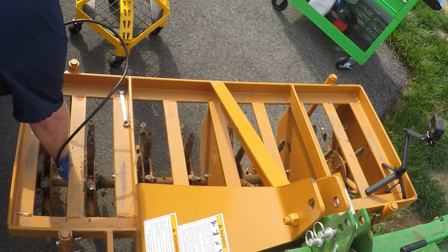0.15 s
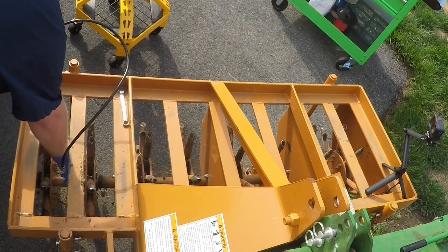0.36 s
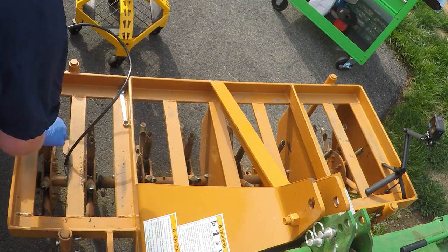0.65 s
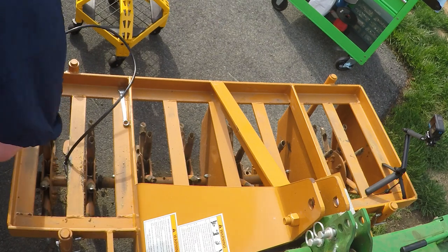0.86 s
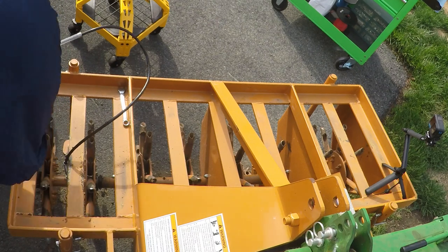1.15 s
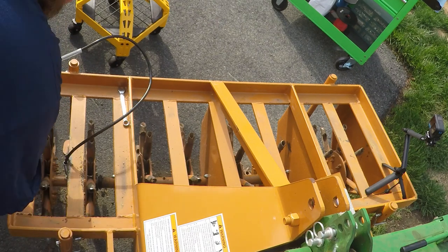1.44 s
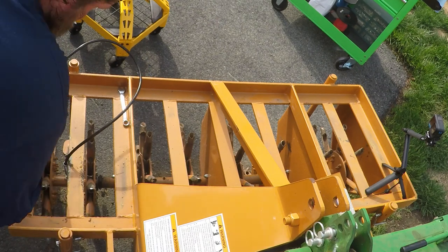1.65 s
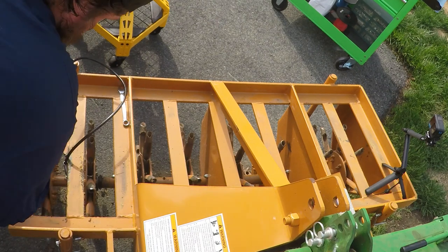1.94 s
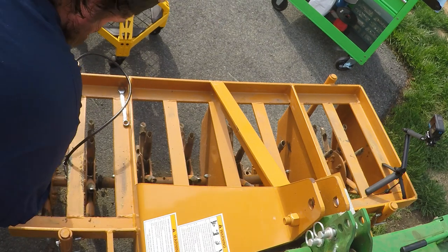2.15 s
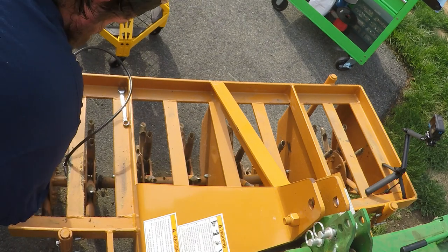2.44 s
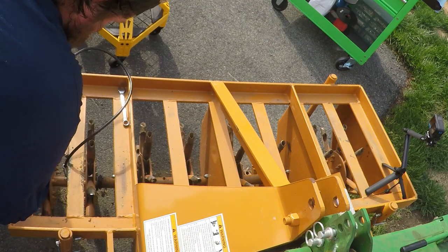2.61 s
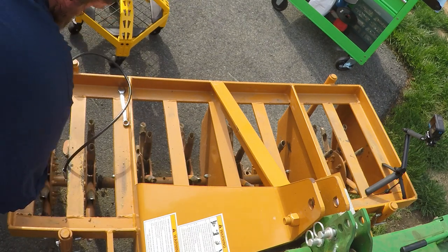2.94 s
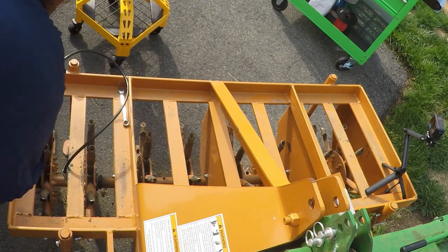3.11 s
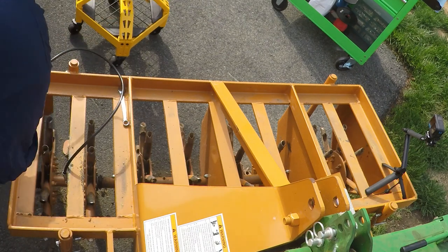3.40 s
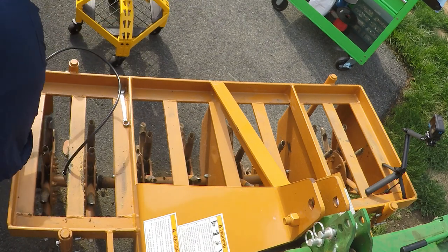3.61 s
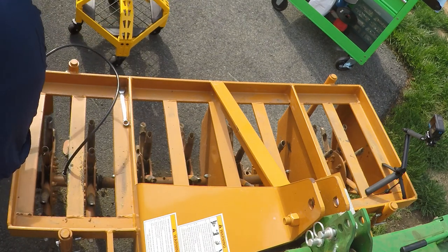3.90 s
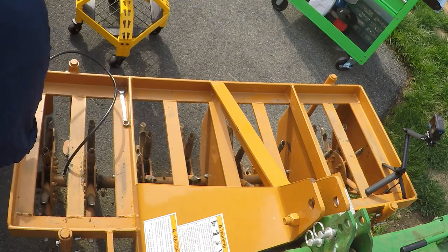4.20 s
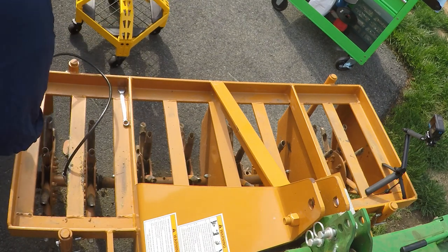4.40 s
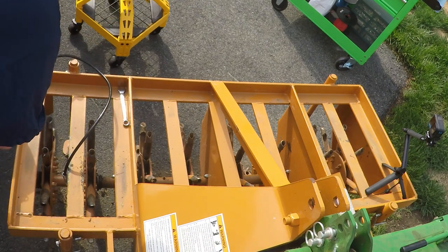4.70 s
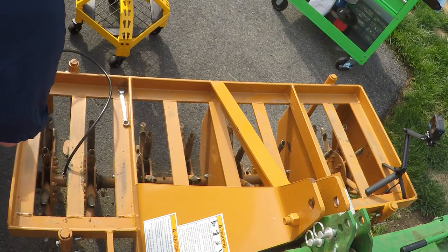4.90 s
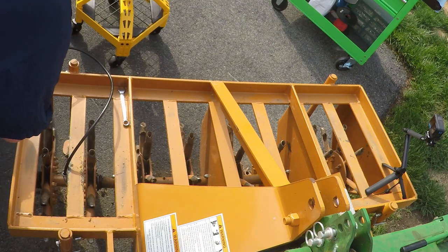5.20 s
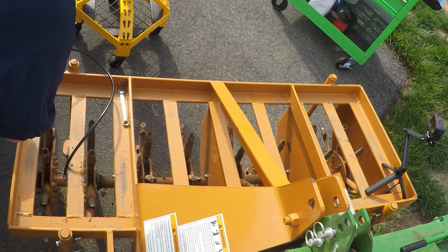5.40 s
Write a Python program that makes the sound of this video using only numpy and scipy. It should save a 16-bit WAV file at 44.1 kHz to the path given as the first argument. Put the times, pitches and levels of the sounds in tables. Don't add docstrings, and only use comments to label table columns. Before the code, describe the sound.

Constant low engine drone outdoors, one idle smooth and wandering, the other rougher. Quiet handling of hose and trigger comes first, with a few clicks. A battery grease gun then bursts in close by, much louder: buzzing motor, gear whine, grinding teeth and rattling housing, sagging and recovering with each plunger stroke. After a short gap of engine hum a second burst follows, still running at the end. Dry, close, almost centred sound with little extreme treble.

```python
import sys
import numpy as np
from scipy import signal
from scipy.fft import rfft, irfft, next_fast_len
from scipy.io import wavfile

SR = 44100
rng = np.random.default_rng(int(sys.argv[2]) if len(sys.argv) > 2 else 0)


def elevation(decibels):
    levels = np.asarray(decibels, float)
    return 10 ** (levels / 20)


def to_wav(s):
    ch = np.atleast_2d(s).T
    pcm = np.round(np.clip(ch, -1, 1) * 32767)
    wavfile.write(sys.argv[1], SR, pcm.astype(np.int16))


N = 244755

# (firing f/Hz if steady, line width f/Hz, [(firing order, level/dB rms)]); the smooth one's f is in its idle
SMOOTH_ENGINE = (0.53, [(1, -52.5), (4, -44.5), (5, -58), (6, -60)])
ROUGH_ENGINE = (86.3, 1.72, [(1, -51.5), (1.2, -61), (2, -46.5), (2.61, -49.5), (3, -49), (4, -61.5)])
# (t/s, firing f/Hz, second order level/dB)
SMOOTH_IDLE = [(0.0, 70.0, -43), (0.45, 70.2, -52), (0.8, 70.43, -42.5), (1.2, 70.73, -48),
               (1.5, 69.3, -39), (1.85, 69.23, -44.5), (2.2, 69, -39), (2.75, 69.3, -47.5),
               (3.2, 69.4, -40), (3.9, 70, -47), (4.1, 70.47, -60), (4.7, 70.41, -43.5), (5.55, 70.7, -49)]
# (f/Hz, level/dB per Hz)
ENGINE_ROAR = [(15, -49), (25, -42), (65, -12.5), (163, -4), (217, 2), (283, -3), (341, -9.5), (493, -14.5),
               (659, -14.5), (3560, -30), (5880, -42.5), (7260, -48.5), (9210, -73), (11100, -69),
               (13700, -93)]
# (loudest t/s, level/dB, rise t/s, fall t/s)
RUBS = [(0.0, -67, .02, 0.11), (0.5, -65.5, 0.051, 0.11), (0.588, -58, .025, .03), (0.885, -66, .012, 0.15),
        (1.058, -67, .08, .05), (1.26, -68.5, 0.23, .2), (1.42, -63.5, .04, .04), (1.55, -72, .15, .1),
        (1.672, -57.5, 0.081, 0.029), (1.862, -65, .012, .04), (4.1, -66, .03, 0.12),
        (4.564, -66, .015, .015), (4.6, -64, .04, .01)]
# (f/Hz, level/dB per Hz)
RUSTLE_COLOUR = [(1500, 1), (3000, 7.5), (6000, 1.5), (8000, -10.5), (11000, -9), (13800, -28)]
# (t/s, peak level/dB)
TICKS = [(0.1945, -56), (0.2994, -58), (0.5344, -36), (0.5844, -55.5), (0.8804, -38.5), (1.4156, -51),
         (1.4894, -44), (1.609, -41.5), (1.6694, -63), (1.8597, -61), (4.4294, -66)]
# (on t/s, off t/s, starting load 0-1)
TRIGGER = [
    (1.910, 4.02, 1),
    (4.607, 5.6, .95),
]
# (pressure build t/s, extra brush sparking level/dB, its fading t/s, rattle at first level/dB)
STARTS = [
    (0.29, 11, 0.058, -5.5),
    (0.082, 5.0, 0.68, -11),
]
# (t/s, pull on shaft f/Hz, grind level/dB, whine level/dB, pressure boom level/dB)
STROKES = [(2.082, 134.3, 0.5, -33.5, -25), (2.296, 117.7, -3.5, -31.5, -24.5),
           (2.499, 123.8, 3.5, -34, -27), (2.709, 136.7, 5.5, -31, -27.5), (2.92, 136.8, 0.5, -32, -26),
           (3.132, 138.3, -2, -32, -27.5), (3.343, 136.3, -1, -31.5, -28.5), (3.554, 138.7, 0, -29.5, -26),
           (3.765, 142.8, 1, -29, -29.5), (3.975, 135.2, -4, -28, -28.5), (4.796, 130.1, 3, -34.5, -26),
           (5.005, 133.4, 2, -31, -24.5), (5.215, 136.6, 4.5, -34.5, -26),
           (5.427, 132.2, 3.5, -31.5, -26.5)]
# (multiple of shaft f, level/dB rms at free speed, loss/dB when slowed, roughness 0-1)
SHAFT_ORDERS = [(1, -42.5, 9, 0), (2, -46, -4.5, 0.04), (3, -41, 2, 0), (4, -34, 8.5, 0.08),
                (5, -42, 6, 0.12), (6, -46, 1, 0.7), (7, -45, 10, 0), (8, -47.5, -2, 0.5),
                (9, -60, -5, 0.3), (10, -49.5, -13, 0.6), (11, -46.5, -19, 0.5), (15, -40, 1.5, 0.4),
                (20, -56, -6, 0.7)]
GEAR_LINES = [(1.29, -55.5, 2, 0.05), (2.29, -58.5, 7.5, 0.2), (2.7, -43, 0.5, 0.22), (3.3, -45, 6.5, 0.22),
              (3.701, -41.5, 7, .12), (4.29, -55.5, 5, 0), (4.59, -45, 5, 0)]
# (f/Hz, width f/Hz, level/dB)
HOUSING = [(417.4, 6.2, 6), (856, 17, -0.5), (942, 26.5, 3.5), (1146, 13, -1.5), (1362, 17, 0),
           (1545, 6.6, -2), (2133, 56, -10.5), (2518, 17, -3.5), (2790, 26, -11), (3070, 82, -4),
           (3805, 58, -1.5)]
# (f/Hz, level/dB per Hz)
GRIND = [(300, -18), (410, 3), (520, -8), (1000, 22), (2500, 10), (4000, -19.5), (6000, 16), (7500, -5.5),
         (11000, -21), (14000, -33)]
# (f/Hz, level/dB per Hz)
RATTLE = [(210, -38), (350, -19.5), (480, -18.5), (700, -17), (900, -11), (1150, -9), (1400, -11),
          (1670, -16), (2500, -6.5), (4100, -8.5), (4500, -12), (6160, -17.5), (8900, -40), (10900, -33),
          (13700, -53.5)]
# (t/s, peak level/dB)
KNOCKS = [
    (1.9115, -15),
    (4.613, -30),
]
# (f/Hz, side minus mid level/dB)
SIDE_COLOUR = [(20, -7), (60, -24), (150, -55.5), (300, -33), (600, -35.5), (1400, -41.5), (3000, -37),
               (6000, -31.5), (9000, -21), (14000, -1.5)]

FREE_HZ = 365.5


def rms_one(x):
    return x / np.sqrt(np.mean(x ** 2) + 1e-20)


def in_time(rows):
    s, *columns = np.transpose(rows)
    return [np.interp(np.arange(N) / SR, s, c) for c in columns]


def colour(x, points):
    size = next_fast_len(N + 8192)
    hz = np.arange(size // 2 + 1) * SR / size + 1
    at, level_db = np.transpose(points)
    gain = elevation(np.interp(np.log(hz), np.log(at), level_db, left=-70, right=-70))
    return irfft(rfft(x, size) * gain, size)[:N]


def drift(rate_hz):
    r = np.exp(-32 * np.pi * rate_hz / SR)
    chance = rng.standard_normal(N // 16 + 3002)
    slow = signal.lfilter([1], [1, -2 * r, r * r], chance)[3000:]
    return np.interp(np.arange(N) / 16, np.arange(len(slow)), rms_one(slow - slow.mean()))


def filtered(x, order, edge_hz, kind="low"):
    return signal.sosfilt(signal.butter(order, edge_hz, kind, fs=SR, output="sos"), x)


def resonance(x, hz, width_hz):
    r = np.exp(-np.pi * width_hz / SR)
    poles = [1, -2 * r * np.cos(2 * np.pi * hz / SR), r * r]
    return signal.lfilter([(1 - r * r) / 2, 0, (r * r - 1) / 2], poles, x)


def tone(phase, rough, spread_hz):
    rough = np.clip(rough, 0, 1)
    smear = (drift(spread_hz) + 1j * drift(spread_hz)) / np.sqrt(2)
    start = np.exp(2j * np.pi * rng.random())
    wobble = np.sqrt(1 - rough) * start + np.sqrt(rough) * smear
    return np.sqrt(2) * np.real(wobble * np.exp(1j * phase))


def firing_phase(firing_hz, wander):
    return 2 * np.pi * np.cumsum(firing_hz * (1 + wander * drift(1.71))) / SR


def engine(phase, wander_hz, orders, rough):
    return sum(elevation(level_db) * tone(k * phase, rough, wander_hz * np.sqrt(k)) for k, level_db in orders)


def smooth_engine():
    firing_hz, second_db = in_time(SMOOTH_IDLE)
    third_db = -41.5 - 3 * np.abs(firing_hz - 70.2) + 0.91 * drift(8.6)
    wander_hz, orders = SMOOTH_ENGINE
    phase = firing_phase(firing_hz, wander=.0008)
    steady = engine(phase, wander_hz, orders, rough=0.24)
    return steady + engine(phase, wander_hz, [(2, second_db), (3, third_db)], rough=.05)


def rough_engine():
    firing_hz, wander_hz, orders = ROUGH_ENGINE
    return engine(firing_phase(firing_hz, wander=.0031), wander_hz, orders, rough=.4)


def engine_roar():
    roar = rms_one(colour(rng.standard_normal(N), ENGINE_ROAR))
    return elevation(-42.5 + 0.35 * drift(41)) * roar


def rubbing():
    t = np.arange(N) / SR
    edge_db, rest_db = 12, -81
    movements = []
    for s, level_db, rise_s, fall_s in RUBS:
        away = np.where(t < s, (s - t) / rise_s, (t - s) / fall_s)
        movements.append(level_db - edge_db * away)
    return elevation(np.maximum(np.max(movements, axis=0), rest_db))


def hand_rustle():
    grains = rng.standard_normal(N) * elevation(2.6 * drift(150))
    return elevation(4.0) * rubbing() * rms_one(colour(grains, RUSTLE_COLOUR))


def hand_ticks():
    ticks = np.zeros(N)
    for s, peak_db in TICKS:
        i = round(s * SR)
        ticks[i:i + 500] = elevation(peak_db - 12) * np.exp(-np.arange(500) / 110) * rng.standard_normal(500)
    return filtered(ticks, 2, [2500, 9000], "band")


def motor_motion():
    inrush_hz, inrush_s, brake_hz = 338, .0307, 500
    stroke_s, inertia_s = .0671, .082
    t = np.arange(N) / SR
    drive, load, grind = np.zeros(N), np.zeros(N), np.zeros(N)
    for on, off, starting in TRIGGER:
        since = np.clip(t - on, 0, None)
        powered = (t > on) & (t < off)
        drive += powered * (FREE_HZ + inrush_hz * np.exp(-since / inrush_s))
        drive -= brake_hz * ((t >= off) & (t < off + .05))
        load += starting * powered * np.exp(-(since / .12) ** 2)
    for s, pull_hz, grind_db, *_ in STROKES:
        push = np.clip((t - s) / stroke_s, 0, 1)
        drive -= pull_hz * np.sin(np.pi * push)
        bite = np.sin(np.pi * push ** 1.12)
        load += bite
        grind += elevation(grind_db) * bite ** 2
    r = np.exp(-1 / (inertia_s * SR))
    return np.clip(signal.lfilter([1 - r], [1, -r], drive), 0, None), load, grind


def swell(lift_db, delay_s, length_s):
    t = np.arange(N) / SR
    return lift_db * sum(np.sin(np.pi * np.clip((t - row[0] - delay_s) / length_s, 0, 1)) ** 2
                         for row in STROKES)


def gun_levels():
    t = np.arange(N) / SR
    silent_db = -110.
    levels = np.full((3, N), silent_db)
    pressure_db = in_time(STROKES)[3]
    for (on, off, _), (build_s, spark_db, spark_s, first_db) in zip(TRIGGER, STARTS):
        since = np.clip(t - on, 0, None)
        slack_db = -7 * np.exp(-(since / build_s) ** 4)
        boom = pressure_db + swell(4.5, delay_s=-0.017, length_s=0.15) + slack_db
        rattle = -28 + swell(3.85, delay_s=-0.018, length_s=0.1)
        hiss = -54.5 + swell(2.8, delay_s=-.02, length_s=.17)
        hiss += (-18 - spark_db) * np.exp(-(since / 0.028) ** 2)
        hiss += spark_db * np.exp(-since / spark_s)
        start_db = first_db * np.exp(-since / 0.01) - 40 * np.exp(-(since / .002) ** 2)
        brake_db = 480 * np.clip(t - off - 0.014, 0, None)
        sounding = np.array([boom, rattle, hiss]) + start_db - brake_db
        levels = np.where(t >= on, np.maximum(sounding, silent_db), levels)
    return levels


def housing(x, lift_db):
    return x + sum(elevation(lift_db + level_db) * resonance(x, hz, width_hz) for hz, width_hz, level_db in HOUSING)


def take_up_knocks():
    knocks = np.zeros(N)
    for s, peak_db in KNOCKS:
        i = round(s * SR)
        knocks[i:i + 4000] = elevation(peak_db + 5) * np.exp(-np.arange(4000) / 700) * rng.standard_normal(4000)
    thud = resonance(resonance(knocks, 1300, 2500), 1800, 4000)
    return filtered(resonance(knocks, 3850, 300) + 0.35 * thud, 4, 6500)


def gear_rattle(phase, low_db, bright_db, hiss_db):
    contacts = rng.standard_normal(N) * elevation(1.14 * drift(200) + 1.03 * np.cos(phase))
    body = housing(colour(contacts, RATTLE), lift_db=5.5)
    boom = elevation(low_db - 2.33 + 0.72 * drift(6.7)) * rms_one(filtered(body, 3, 1700))
    bright = elevation(bright_db - 1.0) * rms_one(filtered(body, 3, [1700, 9000], "band"))
    hiss = elevation(hiss_db + 1.0) * rms_one(filtered(body, 6, 9000, "high"))
    return boom + bright + hiss


def whine(shaft_hz, phase, load):
    commutator_bars, pinion_teeth = 12, 18
    t = np.arange(N) / SR
    slowing = np.clip((FREE_HZ - shaft_hz) / 50, 0, 6)
    spin_up_db = 12 * np.clip(slowing - 1.2, 0, None)
    stroke_loss_db = np.where(t < TRIGGER[1][0], 14, 3)
    fade_db = spin_up_db + stroke_loss_db * slowing ** 1.5
    bars_db = in_time(STROKES)[2] + 1.5 - fade_db - 2.0 * load + 1.4 * drift(25)
    commutator = elevation(bars_db) * tone(commutator_bars * phase, rough=.08, spread_hz=26)
    orders = 0
    for order, free_db, loss_db, rough in SHAFT_ORDERS + GEAR_LINES:
        level_db = free_db - max(loss_db, 0) * slowing + 2.7 * drift(9.7)
        orders += elevation(level_db) * tone(order * phase, rough, spread_hz=12 + 5.5 * order)
    orders = elevation(-1 - spin_up_db) * housing(orders, lift_db=-7)
    pinion_db = -56 + 19 * np.clip(load, 0, 1)
    pinion = elevation(pinion_db) * tone(pinion_teeth * phase, rough=.65, spread_hz=140)
    return commutator + orders + pinion + elevation(11) * resonance(pinion, 3850, 350)


def tooth_grind(grind):
    scrape = rng.standard_normal(N) * elevation(0.65 * drift(340))
    return elevation(-32.5) * grind * rms_one(colour(scrape, GRIND))


def grease_gun():
    shaft_hz, load, grind = motor_motion()
    phase = 2 * np.pi * np.cumsum(shaft_hz) / SR
    low_db, bright_db, hiss_db = gun_levels()
    running = np.clip(elevation(bright_db + 33), 0, 1) * np.clip(shaft_hz / 100, 0, 1)
    driven = running * (whine(shaft_hz, phase, load) + tooth_grind(grind))
    return driven + gear_rattle(phase, low_db, bright_db, hiss_db) + take_up_knocks()


def scene():
    engines = smooth_engine() + rough_engine() + engine_roar()
    mid = engines + hand_rustle() + hand_ticks() + grease_gun()
    side = colour(mid, SIDE_COLOUR) * drift(30)
    return np.array([mid + side, mid - side])


def roll_off(x):
    return signal.sosfilt(signal.butter(12, 13830, fs=SR, output="sos"), x)


def record(dry):
    notch_hz, notch_width_hz = 9000, 1840
    notched = signal.lfilter(*signal.iirnotch(notch_hz, notch_hz / notch_width_hz, fs=SR), dry)
    treble = signal.sosfiltfilt(signal.butter(2, 9000, "high", fs=SR, output="sos"), notched)
    mix = notched + .045 * treble * [[-1], [1]]
    return roll_off(mix)


dry = scene()
out = record(dry)
to_wav(out)
```